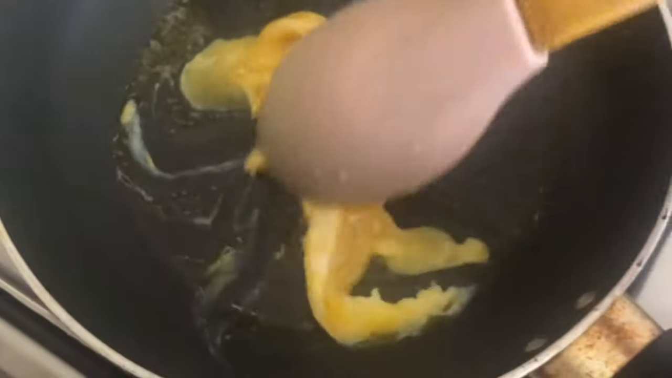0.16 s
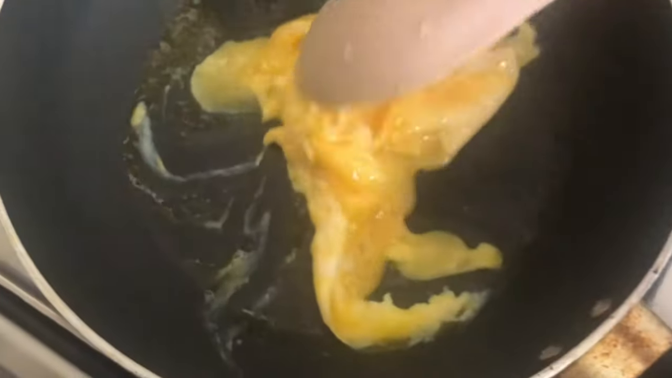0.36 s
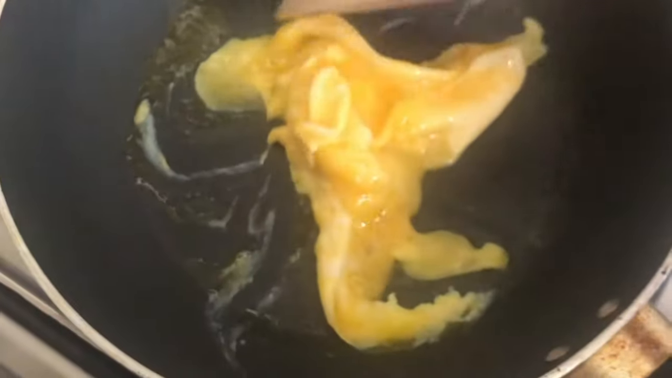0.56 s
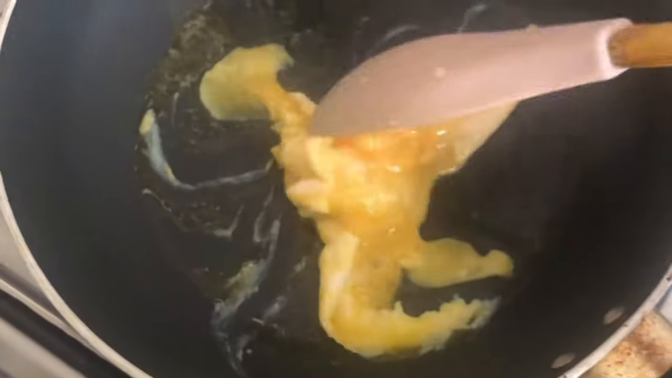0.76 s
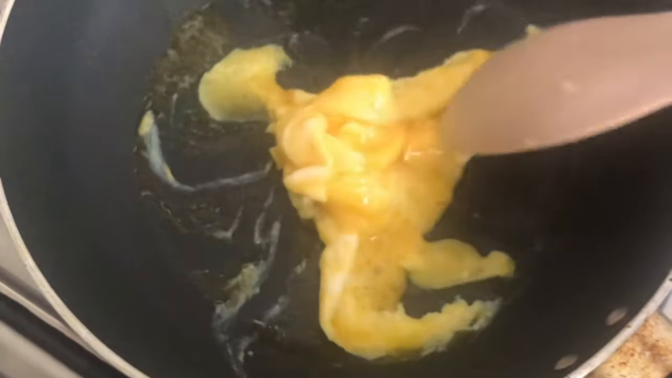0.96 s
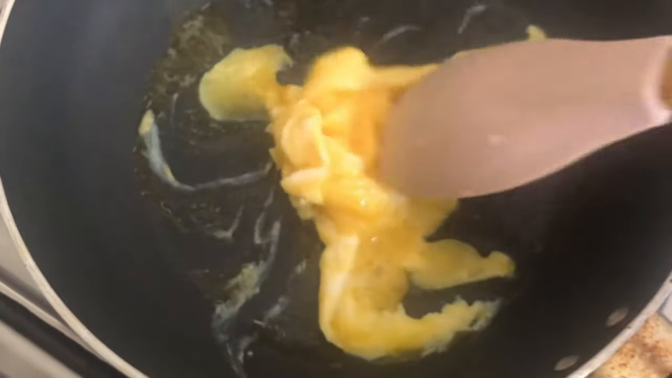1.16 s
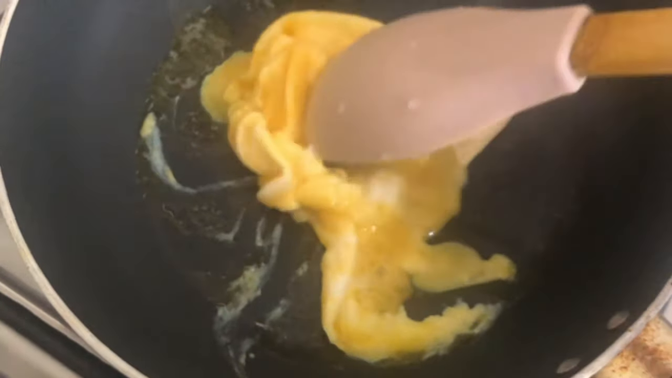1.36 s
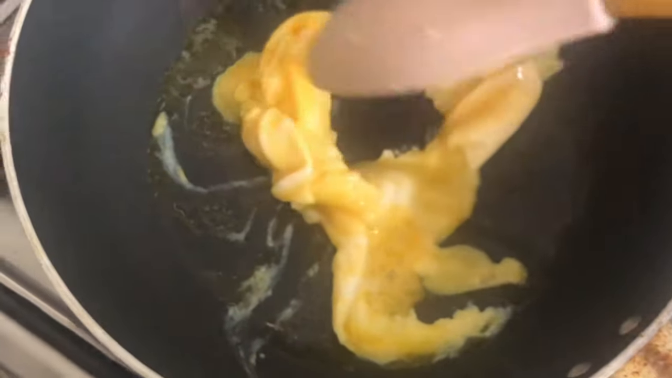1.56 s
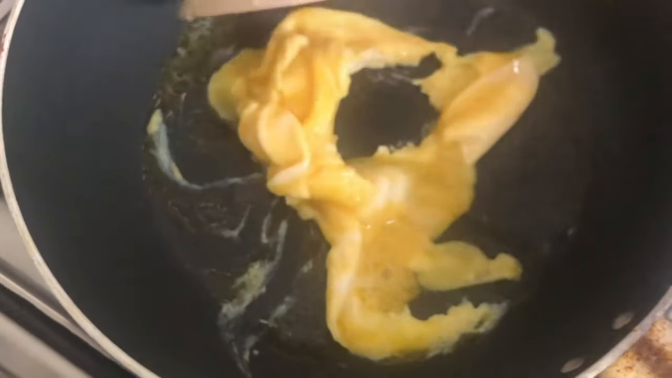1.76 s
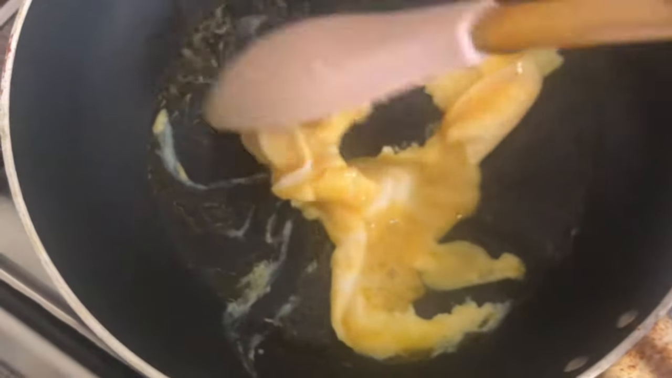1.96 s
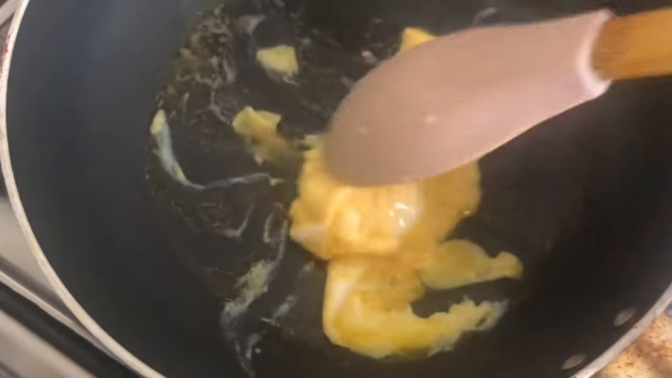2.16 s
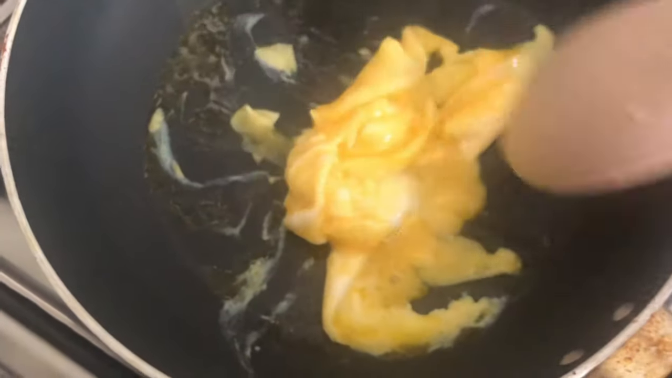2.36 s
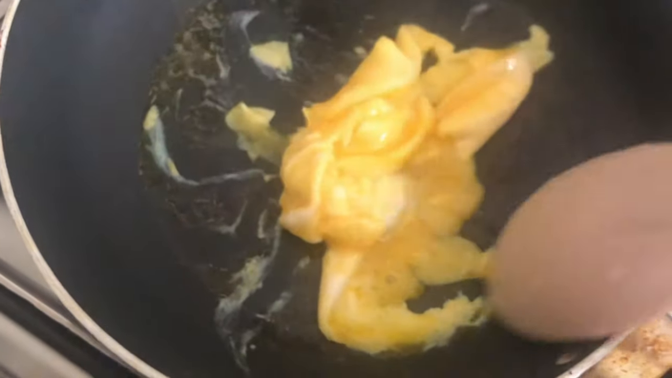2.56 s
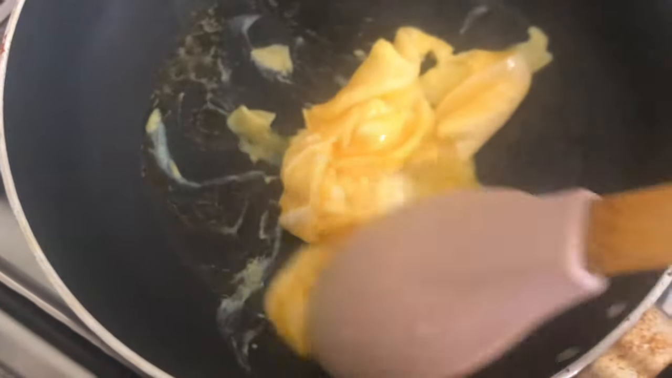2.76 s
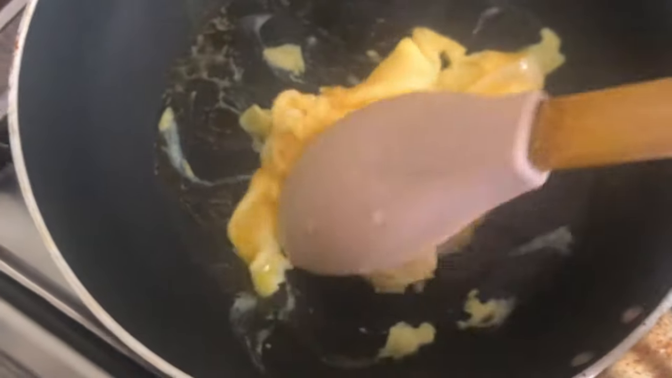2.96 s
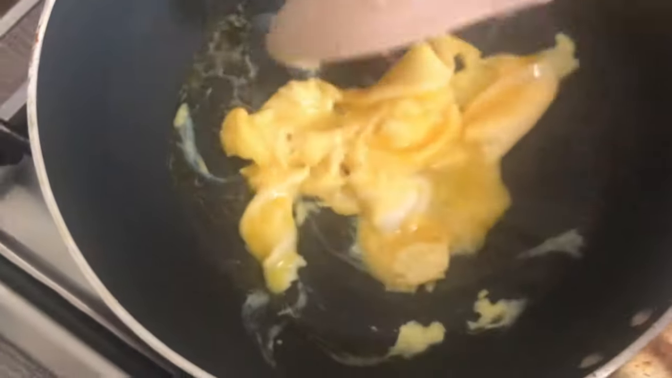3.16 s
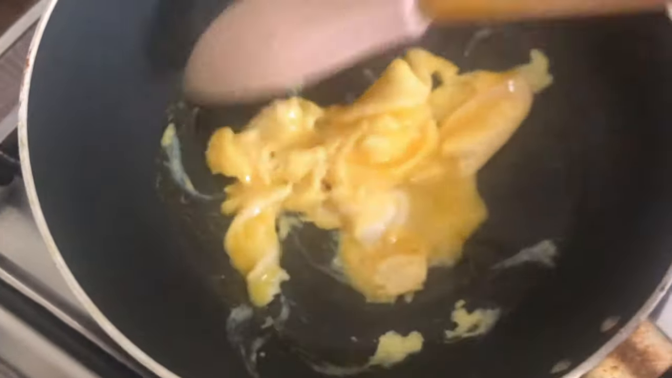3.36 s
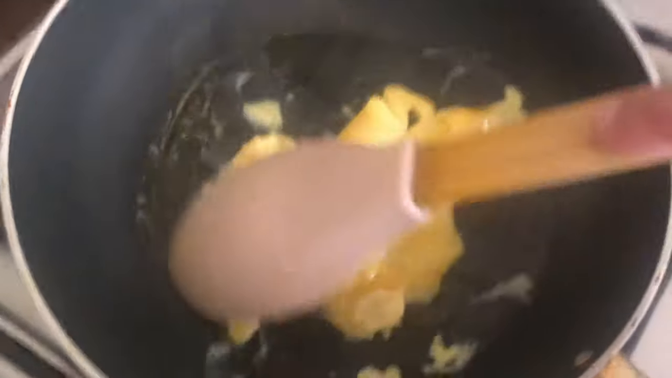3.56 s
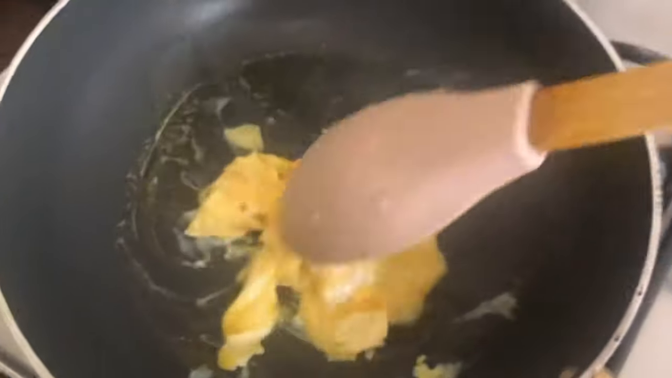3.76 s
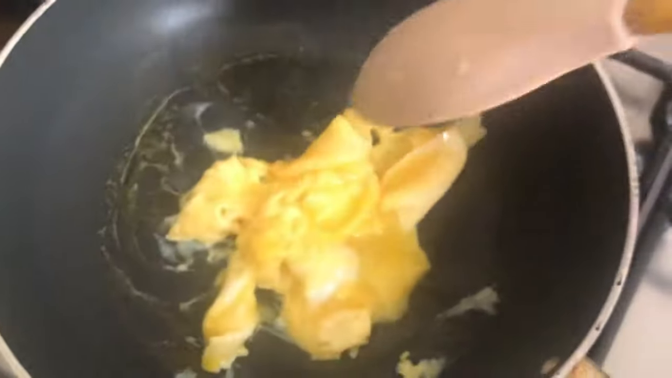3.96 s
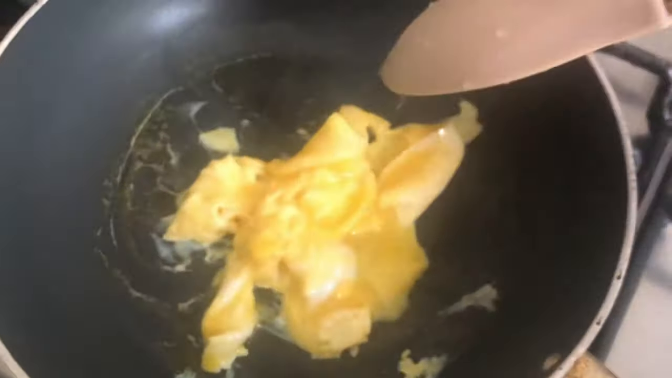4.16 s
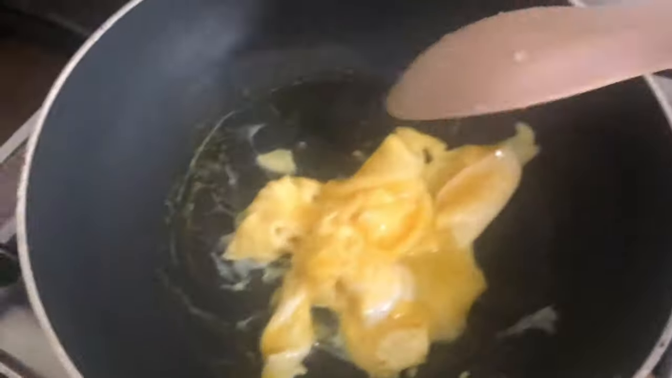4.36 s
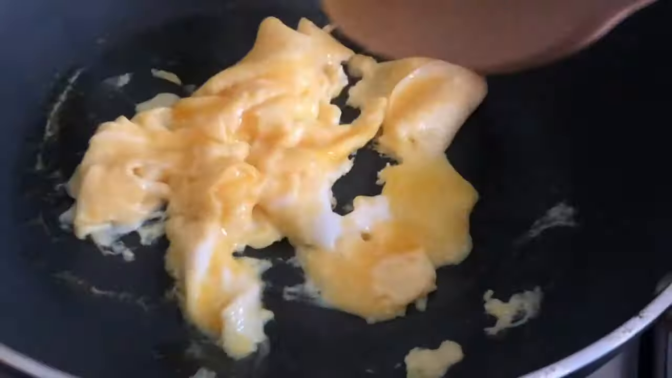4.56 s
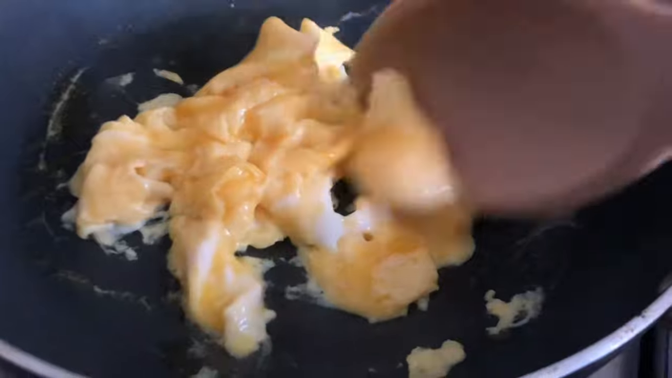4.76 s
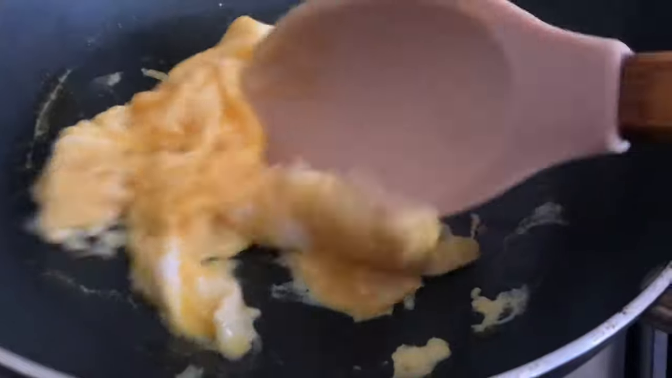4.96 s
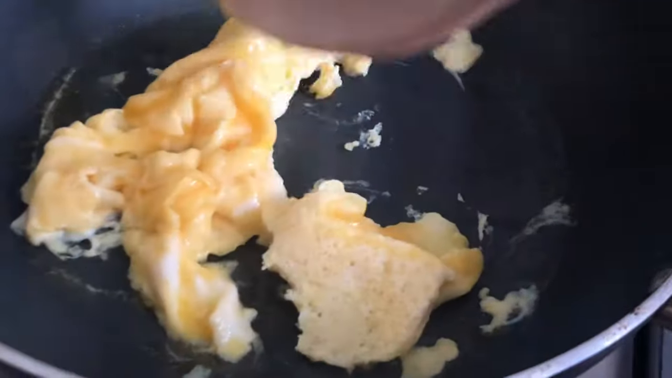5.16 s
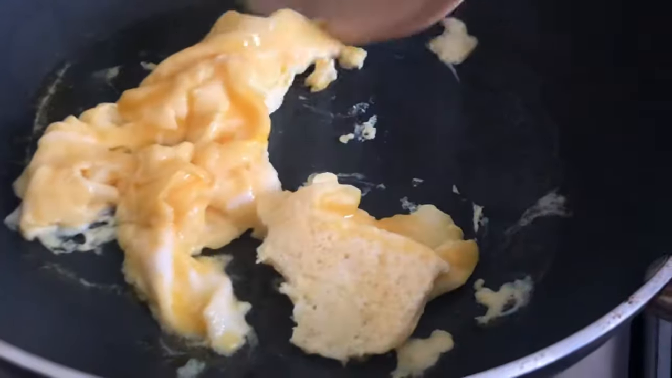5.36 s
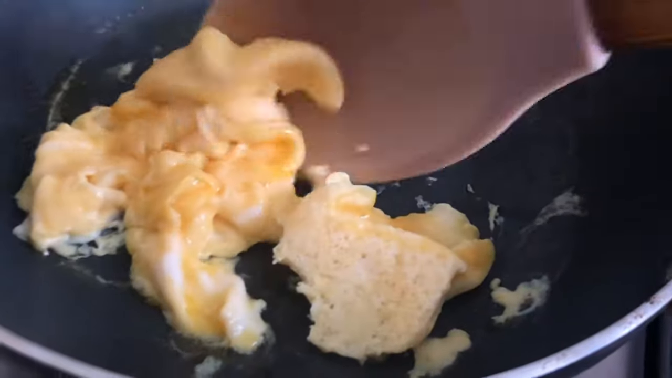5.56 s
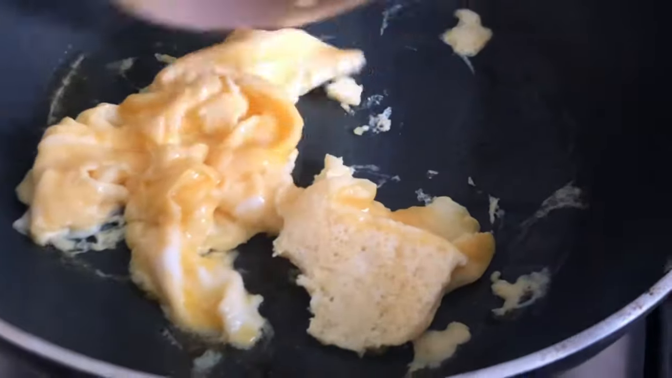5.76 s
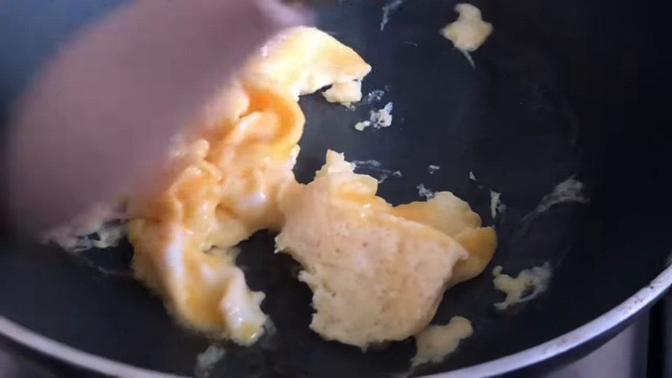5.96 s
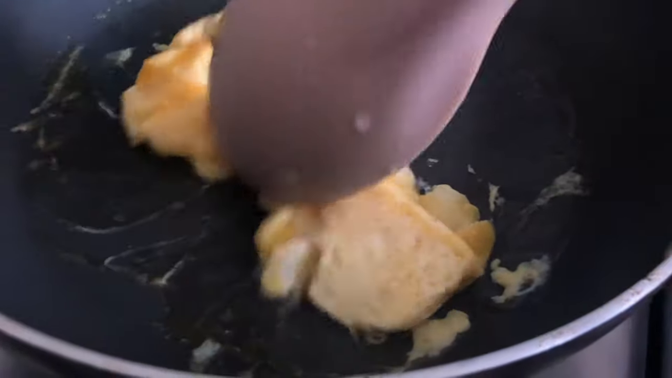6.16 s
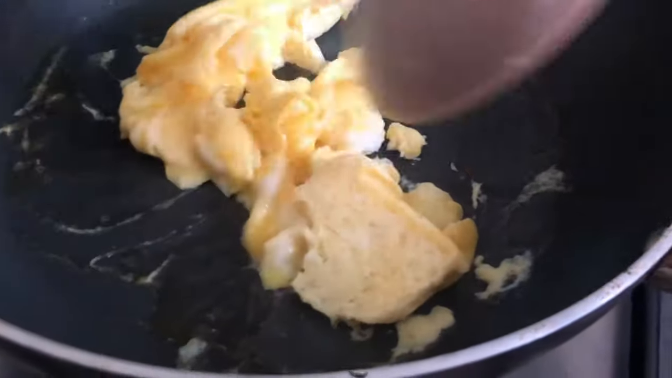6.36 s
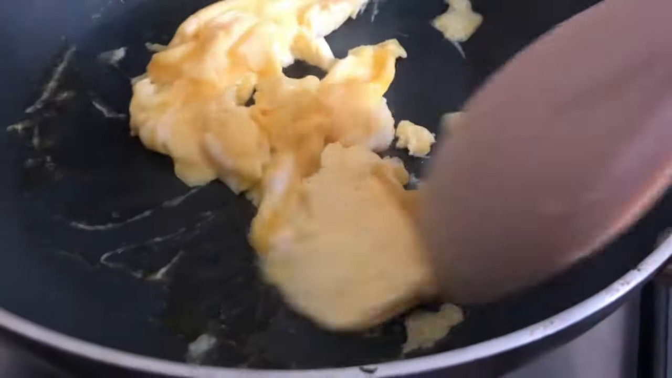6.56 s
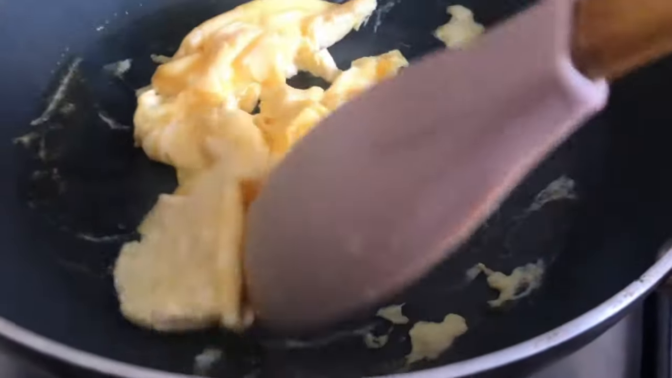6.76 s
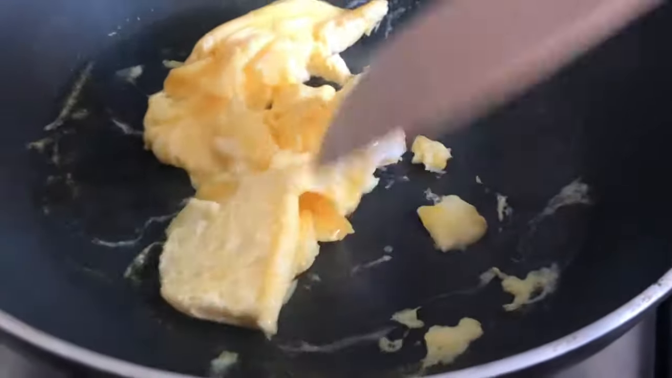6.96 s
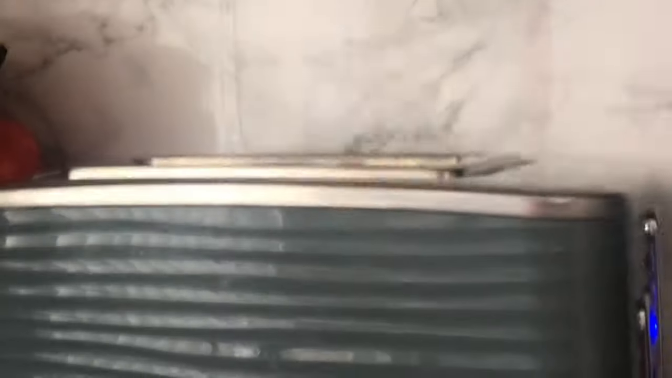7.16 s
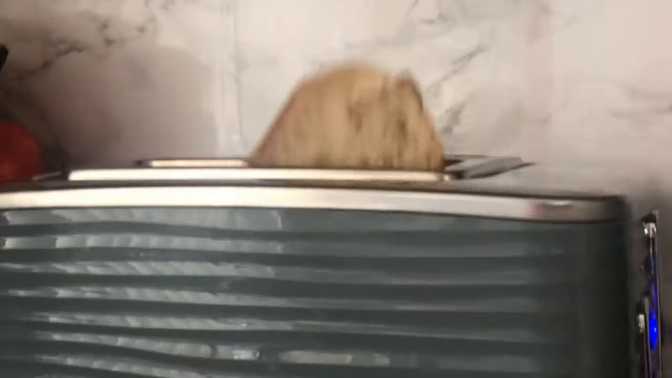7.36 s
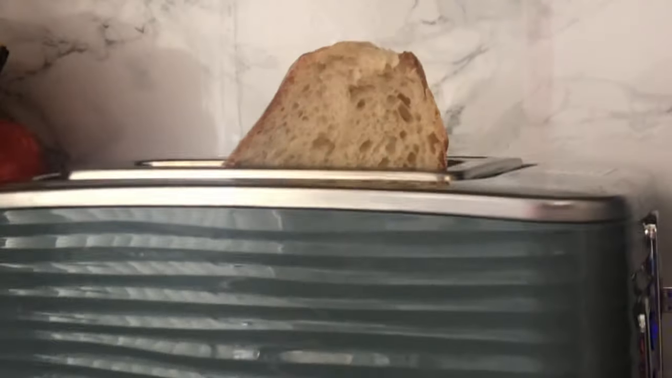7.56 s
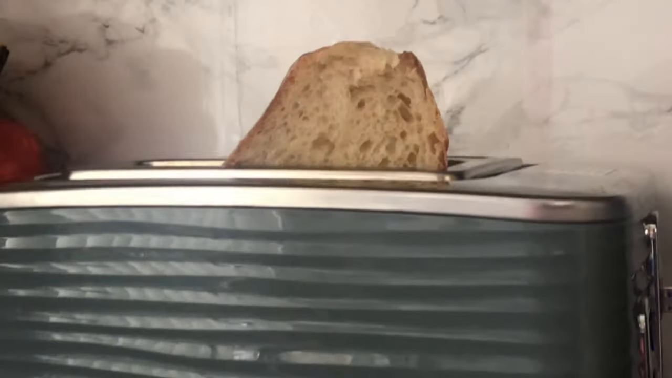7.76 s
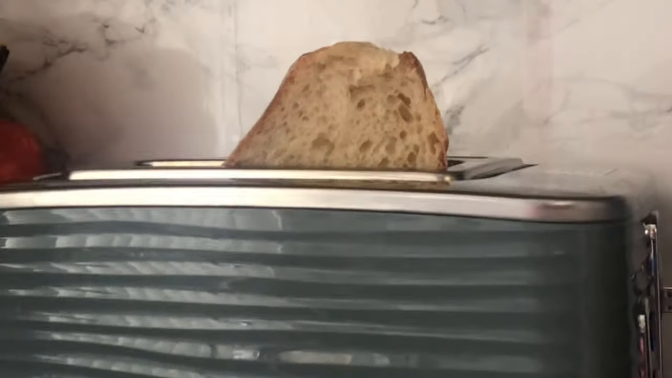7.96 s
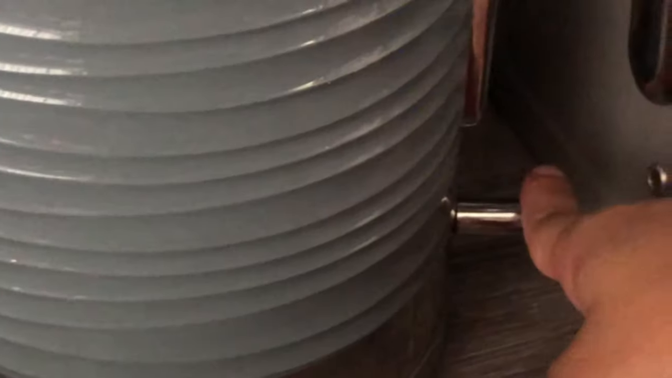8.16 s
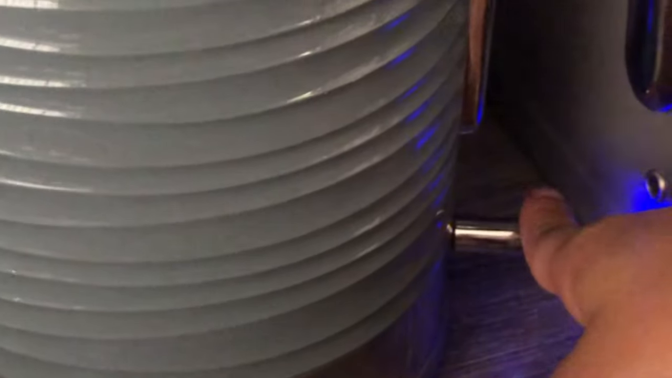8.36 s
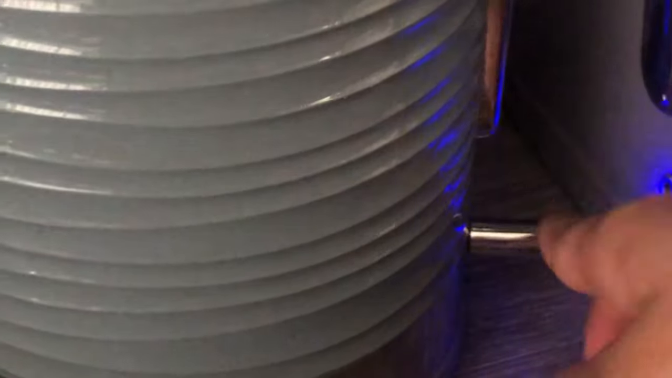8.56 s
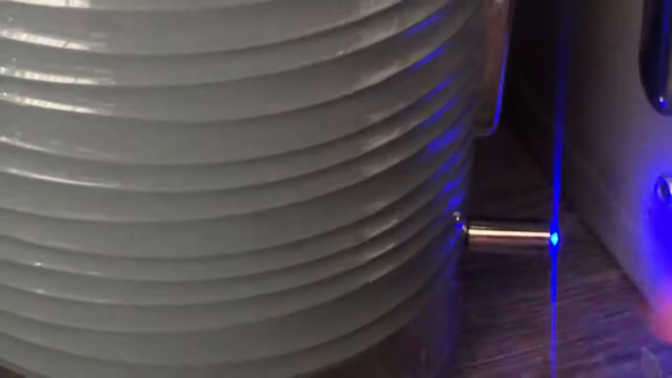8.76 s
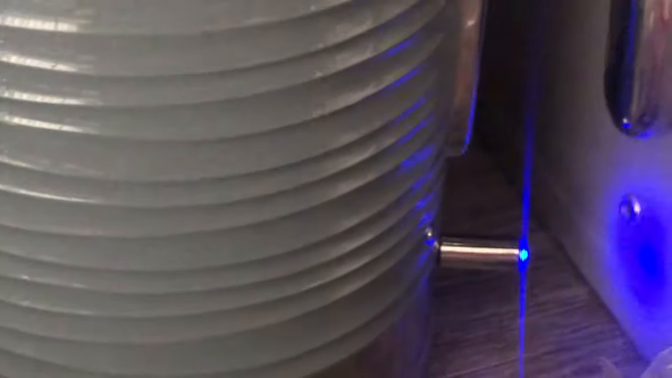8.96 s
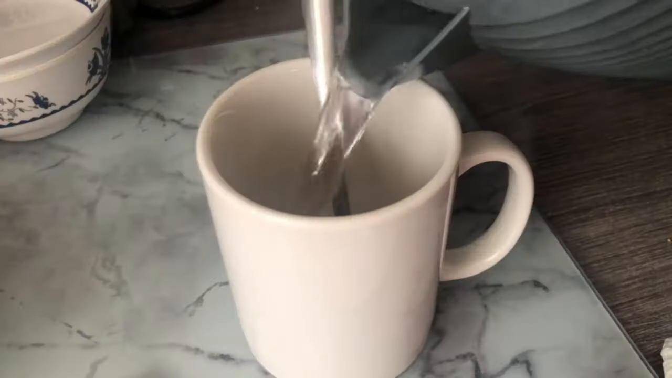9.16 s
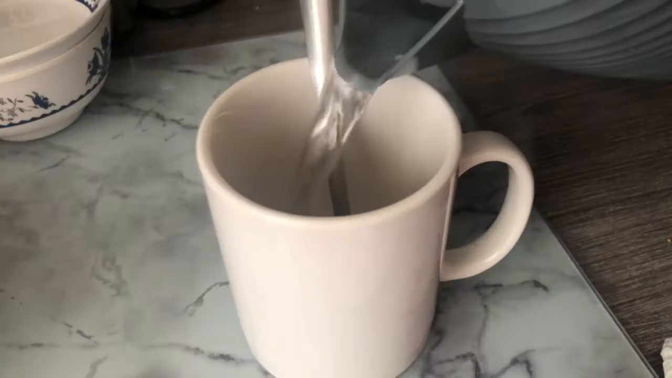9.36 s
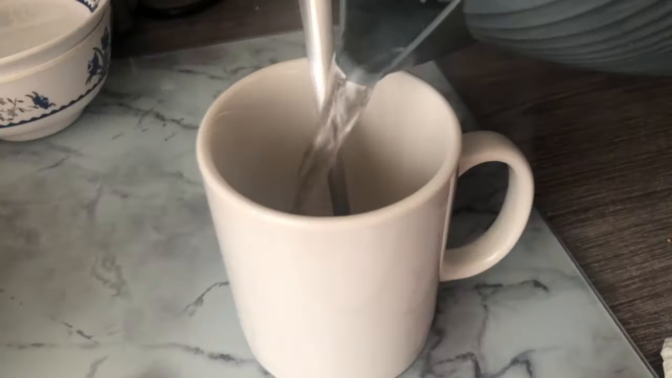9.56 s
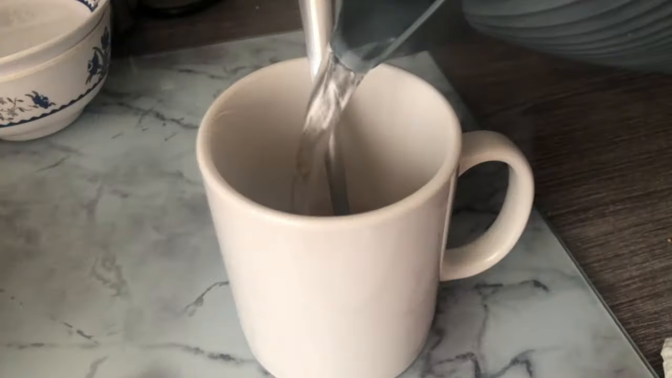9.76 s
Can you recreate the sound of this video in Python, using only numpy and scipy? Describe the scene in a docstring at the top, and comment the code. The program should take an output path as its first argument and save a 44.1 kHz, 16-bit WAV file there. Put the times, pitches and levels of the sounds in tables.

```python
"""Over room rumble, a humming fridge and hiss, eggs sizzle as bursting grains and spitting clicks; a soft spoon
scrapes noise through the pan wall and thumps ringing modes, and the pan clacks on its grate. The sound drops
out for a moment at 4.4 s and the sizzle comes back louder. At 7 s the sizzle fades; a toaster lever slams down
and knocks and rattles a sheet-metal box. At 8 s plastic creaks and a kettle switch clacks under a finger. Last,
water pours into a mug as splashes, bubbles and an air-column tone of rising pitch."""
import sys
import numpy as np
from scipy import signal
from scipy.fft import rfft, irfft
from scipy.io import wavfile

SR = 44100
rng = np.random.default_rng(int(sys.argv[2]) if len(sys.argv) > 2 else 0)


def persist_wave(psi):
    """Save psi, clipped to +-1, as 16-bit WAV."""
    counts = np.round(np.clip(psi, -1, 1) * 32767).astype(np.int16)
    wavfile.write(sys.argv[1], SR, np.atleast_2d(counts).T)


N = 432180

# Levels in the tables are starting points: the functions add their own trims.


def from_db(db):
    """Decibels to an amplitude factor."""
    return 10 ** (np.asarray(db) / 20)


def rms_one(x):
    """Scale to an rms of 1."""
    return x / np.sqrt(np.mean(x ** 2) + 1e-20)


def in_time(rows):
    """Draw straight lines through the columns of a table whose first column is t/s."""
    s, *columns = np.transpose(rows)
    return [np.interp(np.arange(N) / SR, s, column) for column in columns]


def sine(hz, length):
    """A sine of steady pitch, length in samples."""
    return np.sin(2 * np.pi * hz * np.arange(length) / SR)


def gliding_sine(hz):
    """A sine whose pitch follows a curve, by summing its phase."""
    return np.sin(2 * np.pi * np.cumsum(hz) / SR)


def drift(rate):
    """Slow random wander: normal steps of spread 1, rate per second, joined by lines."""
    steps = rng.standard_normal(int(N / SR * rate) + 2)
    return np.interp(np.arange(N) / SR * rate, np.arange(len(steps)), steps)


def coloured(spectrum, x=None):
    """Noise (or the given grains) shaped to a spectrum, rms 1."""
    hz, db = np.transpose(spectrum)
    x = rng.standard_normal(N) if x is None else x
    log_hz = np.log(np.arange(N // 2 + 1) * SR / N + 1)
    gain = from_db(np.interp(log_hz, np.log(hz), db))
    return rms_one(irfft(rfft(x) * gain, N))


def ring(x, hz, t60):
    """A resonance: a unit click sets a sine of height 1 ringing, down 60 dB after t60."""
    radius, angle = from_db(-60 / (t60 * SR)), 2 * np.pi * hz / SR
    feedback = [1, -2 * radius * np.cos(angle), radius * radius]
    return signal.lfilter([0, np.sin(angle)], feedback, x + 1e-18)


def add(out, s, piece):
    """Mix a short piece in at time s."""
    at = round(s * SR)
    out[at:at + len(piece)] += piece[:N - at]


def dying(t60, rise=0.000099):
    """Envelope of a short rise and an exponential fall."""
    t = np.arange(int(1.62 * t60 * SR) + 9) / SR
    return (1 - np.exp(-t / rise)) * from_db(-60 * t / t60)


def struck(blows, modes, spread_db, contact_hz):
    """Each blow strikes every mode with its own strength; a soft contact spares the high modes."""
    out = np.zeros(N)
    chance = rng.standard_normal((len(blows), len(modes)))
    for k, (hz, level_db, t60) in enumerate(modes):
        clicks = np.zeros(N)
        for (s, db), cut_hz, luck in zip(blows, contact_hz, chance[:, k]):
            softness = 1 + (hz / cut_hz) ** 2
            clicks[round(s * SR)] = from_db(db + level_db + spread_db * luck) / softness * (-1) ** k
        out += ring(clicks, hz, t60)
    return out


def bursts(events, spectrum):
    """Coloured noise that starts at once and dies: rows of (t/s, level/dB, t60/s)."""
    envelope = np.zeros(N)
    for s, db, t60 in events:
        add(envelope, s, from_db(db) * dying(t60))
    return envelope * coloured(spectrum)


def ticks(events, cycles, level_db):
    """Tiny broad clicks: a few cycles at their own pitch, roughened by noise."""
    out = np.zeros(N)
    rough = 1 + .5 * rng.standard_normal((len(events), SR // 5))
    for (s, db, hz), noise in zip(events, rough):
        shape = dying(cycles / hz, rise=0.16 / hz)
        add(out, s, from_db(db + level_db) * shape * noise[:len(shape)] * sine(hz, len(shape)))
    return out


def grains(per_s, spread_db):
    """Random clicks of uneven size and either sign."""
    hits = rng.random(N) < per_s / SR
    sizes = from_db(spread_db * np.minimum(rng.exponential(1, N), 4))
    return hits * sizes * rng.choice([-1, 1], N)


# The kitchen: t/s, room rumble level/dB, fridge hum level/dB
KITCHEN = [(0, -67, -65), (4.38, -63.5, -65.5), (4.44, -65.5, -62), (7.03, -67, -61.5),
           (7.06, -68.5, -61.5), (8.2, -69.5, -72.5), (9.12, -72, -71), (9.16, -64, -70.5), (9.8, -62, -71)]
# Rumble spectrum: f/Hz, level/dB per Hz
RUMBLE = [(15, -47), (40, -8.5), (60, -5), (120, -1.5), (250, -4), (500, -7), (700, -20.5), (950, -9.5),
          (1600, -18), (2500, -28.5), (5000, -58)]
# Fridge motor partials 1, 2, 3 ..: level/dB
HUM_DB = [-12, -10.5, -2, 1.5, -14.5]
# Microphone hiss spectrum: f/Hz, level/dB per Hz
HISS = [(410, -23), (700, -1), (757, -13.5), (1050, -20.5), (2300, -14.5), (11700, -20.5), (16000, -30)]
HUM_HZ, HISS_DB = 118.7, -76.5


def kitchen():
    """Room rumble, the wavering partials of the fridge motor and microphone hiss."""
    rumble_db, hum_db = in_time(KITCHEN)
    turns = np.cumsum(HUM_HZ * (1 + .0008 * drift(3.0))) / SR
    hum = np.zeros(N)
    for k, db in enumerate(HUM_DB):
        hum += from_db(db + 1.2 * drift(15.0)) * np.sin(2 * np.pi * ((k + 1) * turns + rng.random()))
    rumble = from_db(rumble_db + 0.57 * drift(10.0)) * coloured(RUMBLE)
    return rumble + from_db(hum_db - 1.5) * hum + from_db(HISS_DB) * coloured(HISS)


# The pour: t/s, flow level/dB, air column in the mug f/Hz
POUR = [(9.14, -88, 778), (9.152, -71, 799), (9.25, -78.5, 863), (9.4, -72, 959), (9.8, -68, 1094)]
# Loudest splashes: t/s, fine spray level/dB, water body level/dB
SPLASHES = [(9.2235, -51.5, -69), (9.3183, -55, -70), (9.34, -67, -64), (9.358, -62, -59), (9.42, -57, -58),
            (9.443, -54.5, -55.5), (9.5212, -54, -61.5), (9.5575, -49, -42), (9.617, -45, -48),
            (9.631, -47, -52), (9.655, -49, -57), (9.7012, -58, -53), (9.718, -60, -48.5),
            (9.7447, -53, -54), (9.773, -47, -60)]
# Spray spectrum: f/Hz, level/dB per Hz
SPRAY = [(3000, -11.5), (6500, -1.5), (13000, -2), (15800, -5.5)]
# Large bubbles: t/s, level/dB, f/Hz, t60/s
GLUGS = [(9.186, -44, 400, 0.044), (9.247, -51, 3350, 0.059), (9.301, -46, 337, 0.049),
         (9.558, -43, 373, 0.13), (9.631, -46.5, 403, 0.099), (9.728, -46, 634, 0.02)]
# Mug modes: f/Hz, level/dB, t60/s
MUG = [(3170, -11, 0.096), (3800, -12, .03)]
# small splashes and churning water, against the flow
SMALL_SPRAY_DB, SMALL_BODY_DB, SMALL_SPLASH_SPREAD_DB, WASH_DB = 14.5, 12.5, 2.5, 1
GLUG_SAG, GLUG_SAG_S = .35, .008   # a bubble below 1 kHz starts higher by this share and settles


def pour():
    """Splashes spray, swell the tone of the mug's air column and ring the mug; bubbles chirp."""
    flow_db, air_hz = in_time([(9.1, -120, 782)] + POUR)
    flow = from_db(flow_db + 1.0 * drift(60.0))
    luck = SMALL_SPLASH_SPREAD_DB * rng.standard_normal((14, 2))
    at = (SR * rng.uniform(9.14, 9.79, 14)).astype(int)
    small_spray_db = flow_db[at] + SMALL_SPRAY_DB + luck[:, 0]
    small_body_db = flow_db[at] + SMALL_BODY_DB + luck[:, 1]
    splashes = SPLASHES + list(zip(at / SR, small_spray_db, small_body_db))

    column = flow * from_db(8)
    for s, spray_db, body_db in splashes:
        add(column, s, from_db(body_db + 1.0) * dying(0.039, rise=.002))
    wobble = signal.lfilter([1], [1, -.994], rng.standard_normal(N))   # slow noise gives the tone a width
    tone = column * rms_one(wobble) * gliding_sine(air_hz)

    water = bursts([(s, spray_db, .025) for s, spray_db, body_db in splashes], SPRAY)
    water += flow * coloured(SPRAY, grains(900.0, 3.78))
    wash_spectrum = [(200, -10), (500, 0), (1500, -4.5), (4000, -7), (7000, -18.5)]
    water += from_db(WASH_DB) * flow * coloured(wash_spectrum, grains(2500.0, 2.9))
    body_spectrum = [(500, -22.0), (1500, -3), (4000, 0.5), (7000, -11.5)]
    water += bursts([(s, body_db, .03) for s, spray_db, body_db in splashes], body_spectrum)
    # the mug rings along
    water += from_db(-34) * sum(from_db(db) * ring(water, hz, t60) for hz, db, t60 in MUG)

    out = water + tone
    times = rng.uniform(9.16, 9.79, 60)
    sizes, pitches = rng.standard_normal((2, 60)).clip(-2, 2)
    bubbles = [(s, -60 + 6.0 * size, 950 * 1.5 ** pitch) for s, size, pitch in zip(times, sizes, pitches)]
    out += ticks(bubbles, cycles=17.0, level_db=-5.5)
    for s, db, hz, t60 in GLUGS:
        shape = dying(t60, rise=0.0014)
        sag = GLUG_SAG * (hz < 1000) * np.exp(-np.arange(len(shape)) / SR / GLUG_SAG_S)
        add(out, s, from_db(db) * shape * gliding_sine(hz * (1 + sag)))
    return out


# Switch contacts: t/s, level/dB
SWITCH = [(8.209, -40), (8.213, -42), (8.217, -22.5), (8.2195, -15.5), (8.245, -46), (8.28, -49)]
# Kettle body modes: f/Hz, level/dB, t60/s
KETTLE = [(89.4, -27, 0.16), (543, 3, 0.061), (722, 0.5, 0.057), (515, -20, 0.23), (737, -27, 0.35),
          (1366, -12, 0.046), (1780, -12, 0.028), (4070, -15, .03), (7800, -7, 0.055)]
# Snap spectrum: f/Hz, level/dB per Hz
SNAP = [(880, -48), (1500, -8), (2910, -9), (3960, 1), (6000, -12.5), (8660, -0.5), (16000, -10.5)]
# Finger rubbing off the switch: t/s, level/dB
RUB = [(8.4, -72), (8.45, -66), (8.505, -58), (8.522, -52.5), (8.57, -59.5), (8.615, -55.5), (8.655, -74)]
# Plastic creaks: t/s, level/dB, f/Hz
TICKS = [(8.001, -40.5, 3630), (8.097, -42, 3700), (8.323, -49.5, 3950), (8.3471, -41, 4530),
         (8.4068, -34.5, 5340), (8.418, -50, 3000), (8.479, -37.5, 3700), (8.497, -41, 5500),
         (8.528, -43, 2200), (8.542, -28, 5500), (8.558, -36, 3000), (8.6118, -39, 3890),
         (8.631, -44, 5500), (8.8784, -45, 6120), (8.979, -44, 3880)]
# The skin squeaks once: t/s, level/dB, f/Hz, length/s
SQUEAK = (8.582, -54, 1850, .028)
SCUFF_DB, SCUFF_T60_S = -16.5, 0.043   # each creak leaves a short scuff, against its level


def kettle():
    """Quick switch contacts ring the body and rattle the casing; plastic creaks, the finger rubs off."""
    body = struck(np.array(SWITCH) - [0, 6], KETTLE, 0.65, np.full(len(SWITCH), 9000))
    snap = bursts([(s, db - 10, .03) for s, db in SWITCH] + [(8.22, -51, 0.22)], SNAP)
    casing_spectrum = [(200, -2.5), (600, 3.5), (2000, -11.5), (4500, -15), (8000, -26)]
    casing = bursts([(8.212, -36, 0.029), (8.22, -45, 0.33)], casing_spectrum)

    rub_db, = in_time([(8.39, -100)] + RUB + [(8.7, -100)])
    skin = coloured([(400, -9.5), (1500, -0.5), (5000, -5.5), (16000, -13)], grains(5000, 2.6))
    rub = from_db(rub_db + 2.7 * drift(150.0) + 3.0 * drift(45.0)) * skin
    scuffs = [(s, db + SCUFF_DB, SCUFF_T60_S) for s, db, hz in TICKS]
    rub += bursts(scuffs, [(500, -6), (1200, 0), (5000, -5), (16000, -14)])
    s, db, hz, length = SQUEAK
    samples = int(length * SR)
    add(rub, s, from_db(db) * np.hanning(samples) * sine(hz, samples))
    return body + snap + casing + rub + ticks(TICKS, cycles=5.3, level_db=2.5)


# Jolts of the toaster carriage: t/s, bright rattle level/dB, dull rattle level/dB, rise/s, t60/s
JOLTS = [(7.046, -85, -47, 0.013, 0.24), (7.147, -78, -42.5, 0.044, 0.16), (7.232, -36, -37.5, .015, .5),
         (7.2435, -14.5, -31, .008, .07), (7.2495, -18, -33, .006, .04), (7.256, -27.5, -29, .02, 0.38),
         (7.357, -28, -42, .015, .2), (7.41, -31.5, -37.5, 0.16, 0.46), (7.58, -74, -55, 0.68, 1.3)]
LATCH_S, LATCH_T60_S = 7.455, 0.37   # the latch catches and damps what rattled before


def jolted():
    """Each jolt builds up over its rise, dies over its t60, and faster once the latch has caught."""
    t, power = np.arange(N) / SR, np.zeros((2, N))
    for s, bright_db, dull_db, rise, t60 in JOLTS:
        loss_db = 60 * np.maximum((s - t) / rise, (t - s) / t60)
        loss_db += 60 * (s < LATCH_S) * np.maximum(t - LATCH_S, 0) / LATCH_T60_S
        power += from_db(np.c_[[bright_db, dull_db]] - np.minimum(loss_db, 200)) ** 2
    return np.sqrt(power)


# Thin sheet metal spectrum: f/Hz, level/dB per Hz
TIN = [(700, -27), (1200, -8), (2700, -8.5), (3300, -3.5), (5000, -1.5), (6200, -0.5), (7200, -3),
       (11500, -1), (15800, -7)]
# Hollow box spectrum: f/Hz, level/dB per Hz
BOX = [(40, -30), (88, 5), (125, -8), (229, 0), (300, -10.5), (400, -2.5), (600, -10.5), (2000, -17.5),
       (5000, -20.5), (8000, -45.5)]
# Knocks in the toaster: t/s, level/dB, bright tick level/dB, hardness of the contact f/Hz
KNOCKS = [(7.041, -36.5, -64.5, 1500), (7.131, -45, -51, 5000), (7.146, -36.5, -44, 15000),
          (7.242, -25, -21.5, 3000), (7.25, -16, -37, 1500), (7.356, -36, -45, 2000),
          (7.409, -44.5, -41, 2000), (7.58, -32, -45, 1810), (7.615, -50, -50.5, 3000),
          (7.632, -37.5, -53, 1300), (7.672, -49, -50, 3500), (7.701, -43.5, -55, 2010),
          (7.714, -46.5, -53, 2500), (7.737, -47, -53, 2500), (7.753, -41.5, -54, 1600),
          (7.77, -40, -58, 1800)]
# Toaster modes: f/Hz, level/dB, t60/s
TOASTER = [(90, -6, 0.34), (177.4, -5, 0.2), (228, -0.5, 0.11), (385, -7, 0.19), (450, -5, 0.14),
           (765, -4, 0.06), (1027, -13, .15), (1347, -4.5, 0.05), (2520, -8.5, 0.16), (3800, -14.5, .12),
           (4700, -10, .17)]


def toaster():
    """The carriage rattles densely against thin sheet metal and knocks the hollow box."""
    bright, dull = jolted() * from_db(in_time([(7.83, 0), (8, -58)]))
    rattle = bright * coloured(TIN, grains(14000.0, 1.5))
    panel_hz = np.geomspace(1000, 15000, 40) * rng.uniform(1.0, 1.03, 40)   # the panels have crowded modes
    sheet = sum(ring(rattle, hz, 0.2) for hz in panel_hz)
    rows = np.array(KNOCKS)
    knocks = struck(rows[:, :2] - [0, 9], TOASTER, 2.5, rows[:, 3])
    tick_spectrum = [(300, -19.5), (1200, 2.5), (4500, -6), (7000, -15.5), (16000, -19.5)]
    tick = bursts([(s, tick_db, .035) for s, knock_db, tick_db, contact_hz in KNOCKS], tick_spectrum)
    return rattle + from_db(-52.5) * sheet + dull * coloured(BOX) + knocks + tick


# Spoon on the pan: t/s, thump level/dB, slap level/dB
THUMPS = [(0.522, -35.5, -52), (0.539, -42.5, -47), (0.68, -50, -56.5), (1.713, -54, -71),
          (1.805, -30, -50.5), (1.819, -33.5, -55.5), (2.478, -37, -61.5), (2.494, -41, -61),
          (3.314, -36.5, -55.5), (4.595, -43.5, -51), (5.387, -36, -44), (5.42, -43, -64), (5.45, -45, -60),
          (5.945, -42, -60), (5.958, -38, -68), (6.556, -35, -49.5), (6.609, -37, -40)]
# Pan modes: f/Hz, level/dB, t60/s
PAN = [(56, -15.5, 0.5), (126.6, -6.5, 0.5), (168, -8, 0.55), (218.2, -10, 0.33), (283, -13, 0.22),
       (316, -12, 0.32), (348, -10.5, 0.18), (409, -12.5, 0.18), (638, -11.5, 0.14), (733, -12, 0.085),
       (896, -6.5, 0.072), (1234, -3.5, 0.033), (1676, 2.5, 0.035)]
# Pan base on the grate: t/s, level/dB
CLACKS = [(2.6489, -13.5), (2.6941, -16.5), (2.7133, -20), (2.7258, -25), (6.5883, -20.5), (6.6212, -25),
          (6.64, -32.5)]
# Iron grate modes: f/Hz, level/dB, t60/s
GRATE = [(1200, -22, .08), (2050, -19, .04), (2750, -16, .045), (3300, -13, .04), (3570, -10, .04),
         (4200, -9, .05), (4900, -23, .12), (5900, -12, .04), (7550, -12, .05), (8800, -14, .05),
         (9550, -13, .045), (12100, -9, .025)]
# Clack spectrum: f/Hz, level/dB per Hz
CLACK = [(240, -40), (400, -21), (676, -3), (1510, -17), (2120, -8), (2550, -13), (4240, -12.5),
         (11900, -18.5), (16000, -34)]
# The dragged pan sings: t/s, level/dB
SINGING = [(2.485, -90), (2.5, -45), (2.64, -52), (2.66, -89)]
SINGING_HZ, CLACK_T60_S = 305, 0.023
# a clack thumps the pan body too, less dependent on its strength
ROCK_DB, ROCK_SLAP_DB, ROCK_FOLLOWS = -24.5, -40, .45


def pan():
    """Dull spoon thumps ring the pan; hard clacks ring the iron grate; the dragged pan sings."""
    rocks = [(s, ROCK_DB + ROCK_FOLLOWS * db, ROCK_SLAP_DB + ROCK_FOLLOWS * db) for s, db in CLACKS]
    thumps = np.array(THUMPS + rocks)
    body = struck(thumps[:, :2] - [0, 8], PAN, 2.0, np.full(len(thumps), 900))
    slap_spectrum = [(60, -18), (250, 0.5), (1000, -6), (2000, -7.5), (5000, -20), (9000, -56)]
    slap = bursts([(s, slap_db, .05) for s, db, slap_db in thumps], slap_spectrum)
    hob_spectrum = [(40, -20), (120, 5), (350, 4.5), (800, -2.5), (1600, -36.0)]
    hob = bursts([(s, db - 17.0, .25) for s, db, slap_db in thumps], hob_spectrum)   # the hob rumbles
    iron = struck(np.array(CLACKS) - [0, 5], GRATE, 2, np.full(len(CLACKS), 12000))
    crack = bursts([(s, db - 9.5, CLACK_T60_S) for s, db in CLACKS], CLACK)
    walls = bursts([(s, db - 31, .22) for s, db in CLACKS], CLACK)   # the walls answer
    singing_db, = in_time([(2.48, -120)] + SINGING + [(2.67, -120)])
    singing = from_db(singing_db) * sine(SINGING_HZ, N)
    return body + slap + hob + iron + singing + crack + walls


# The eggs between strokes: t/s, high fizz level/dB, wet crackle level/dB, scrape level/dB
SIZZLE = [(0, -77.5, -78, -69), (0.6, -78, -78, -74), (1.7, -75, -77, -73), (1.95, -68.5, -69.5, -68),
          (2.35, -71, -74, -77), (2.7, -69.5, -73, -71.5), (4.38, -72.5, -71, -69), (4.44, -56, -57, -62),
          (5.2, -56.5, -59.5, -62.5), (6.4, -59, -62, -62.5), (7.04, -57.5, -59, -59.5),
          (7.09, -76, -75, -80), (7.13, -97, -90, -97)]
# The spoon turns wet egg onto hot metal: peak t/s, swell level/dB, length/s, share of the swell in the fizz
STROKES = [(0.143, 7.5, 0.061, 1.1), (0.654, 9, 0.21, 0.96), (1.131, 12, 0.24, 0.44),
           (1.776, 6.5, 0.074, 0.38), (2.001, 2, 0.12, .9), (2.133, 10, 0.064, 0.86), (3.715, 3, 0.31, .3),
           (4.199, 0.5, 0.11, .6), (4.62, 6, 0.16, .6), (4.721, 10, 0.22, 0.74), (5.463, 6, 0.18, 0.65),
           (5.902, 1.5, .14, 2.7), (6.195, 7.5, 0.17, 0.92)]
# Fizz spectrum: f/Hz, level/dB per Hz
FIZZ = [(4500, -27), (7000, -12), (9000, -2), (12000, 3), (15800, 0)]
# Crackle spectrum: f/Hz, level/dB per Hz
CRACKLE = [(1500, -18), (2600, -2), (4200, 0), (6500, -2), (9500, -11.5), (13000, -31)]
# Loudest fat spits: t/s, level/dB, f/Hz
POPS = [(0.3296, -47, 12100), (0.6529, -48, 12100), (0.7736, -37, 13400), (0.9438, -41, 7380),
        (0.9727, -33.5, 15100), (1.1144, -33, 9400), (1.5529, -34.5, 13300), (1.6142, -34.5, 13940),
        (1.6621, -39.5, 12820), (1.7444, -36, 14800), (1.8906, -40.5, 12500), (2.0497, -31.5, 12400),
        (2.1914, -39, 6900), (2.5506, -40.5, 9300), (2.819, -41.5, 6000), (3.5887, -37, 13600),
        (4.2936, -42.5, 4640), (4.373, -44, 4600), (5.0893, -34, 6710), (5.4316, -31, 11600),
        (5.898, -34, 6340), (6.4009, -39, 4090)]
# A large bubble bursts and drops in pitch: t/s, level/dB, from f/Hz, to f/Hz
BURST = (4.0317, -22, 4600, 650)
# Pan wall under the spoon: f/Hz, width/Hz, level/dB
SCRAPE = [(926, 57, -3), (1699, 124, 6.5), (2375, 110, -3)]
STROKE_RISE_SHARE, SCRAPE_SHARE = 0.42, 0.83   # rise against length; share of the swell in the scrape
# bubbles a second at that fizz level; fewer when it is quieter
STEAM_PER_S, STEAM_AT_DB, STEAM_FOLLOWS = 9000, -58, .8
# small spits: level, its spread, lowest pitch, highest against lowest
SMALL_POP_DB, SMALL_POP_SPREAD_DB, SMALL_POP_LOW_HZ, SMALL_POP_RANGE = -48.5, 3, 4000, 3.7
POPS_FOLLOW = 1.2   # small spits crowd under the strokes


def frying():
    """Dense bursting steam bubbles fizz and crackle, fat spits; the spoon drags noise through the pan wall."""
    fizz_db, crackle_db, scrape_db = in_time(SIZZLE)
    per_s = STEAM_PER_S * from_db(STEAM_FOLLOWS * (fizz_db - STEAM_AT_DB))   # set before the strokes swell it
    stir_db = np.zeros(N)
    for s, swell_db, length, fizz_share in STROKES:
        start, end = s - STROKE_RISE_SHARE * length, s + (1 - STROKE_RISE_SHARE) * length
        swell, = in_time([(start, 0), (s, swell_db), (end, 0)])
        fizz_db = fizz_db + fizz_share * swell
        crackle_db = crackle_db + swell
        scrape_db = scrape_db + SCRAPE_SHARE * swell
        stir_db = stir_db + swell
    steam = grains(per_s, 3.9) / np.sqrt(per_s)
    sizzle = coloured(FIZZ, steam) * from_db(fizz_db + 0.98 * drift(24.0) + 1.1 * drift(6.8))
    sizzle += coloured(CRACKLE, steam) * from_db(crackle_db + 0.82 * drift(25.0) + .9 * drift(6.9))

    # 170 small spits, all before the sound drops out
    odds = np.cumsum(from_db(POPS_FOLLOW * stir_db)[:int(DROPOUT[0][0] * SR)])
    times = np.searchsorted(odds, odds[-1] * rng.random(170)) / SR
    pitches = SMALL_POP_LOW_HZ * SMALL_POP_RANGE ** np.sqrt(rng.random(170))
    levels = SMALL_POP_DB + SMALL_POP_SPREAD_DB * rng.standard_normal(170)
    small = list(zip(times, levels, pitches))
    spits = ticks(POPS, cycles=8, level_db=4) + ticks(small, cycles=15, level_db=0)

    drag = grains(2000.0, 1.8)
    wall = sum(from_db(db) * rms_one(ring(drag, hz, 2.2 / width)) for hz, width, db in SCRAPE)
    broad = coloured([(300, -76), (800, -0.5), (1500, 0.5), (2600, -1.0), (5000, -15.0)], drag)
    # the harder the spoon presses, the more the wall rings
    scrape = rms_one(wall) * from_db(1.383 * scrape_db + 21.0) + broad * from_db(scrape_db - 5.5)
    out = sizzle + scrape * from_db(0.87 * drift(21.0)) + spits

    s, db, from_hz, to_hz = BURST
    shape = dying(0.0084, rise=0.0001)
    pitch = to_hz + (from_hz - to_hz) * np.exp(-np.arange(len(shape)) / SR / 0.0008)
    add(out, s, from_db(db) * shape * gliding_sine(pitch))
    return out


# Overall gain, with a brief fall into silence: t/s, level/dB
DROPOUT = [(4.383, 2), (4.388, -49.5), (4.405, -82), (4.427, -20), (4.445, -0.5)]


def scene():
    """All sources together under the overall gain."""
    gain_db, = in_time(DROPOUT)
    sources = kitchen() + pour() + kettle() + toaster() + pan() + frying()
    return (from_db(gain_db) * sources)[None]


CUTOFF_HZ = 16000


def record(dry):
    """The deep bass is rolled off and the top is cut."""
    dry = signal.sosfilt(signal.butter(2, 35.0, "high", fs=SR, output="sos"), dry)
    return signal.sosfilt(signal.cheby2(24, 80, CUTOFF_HZ, fs=SR, output="sos"), dry)


dry = scene()
out = record(dry)
persist_wave(out)
```